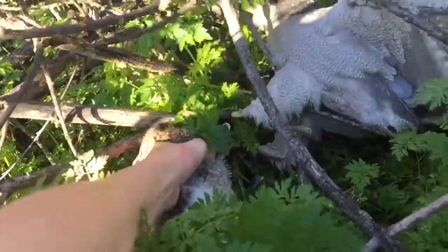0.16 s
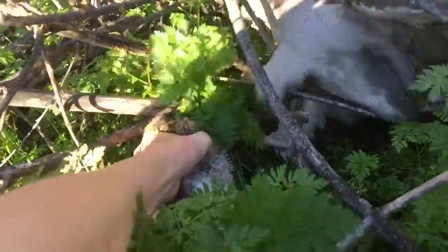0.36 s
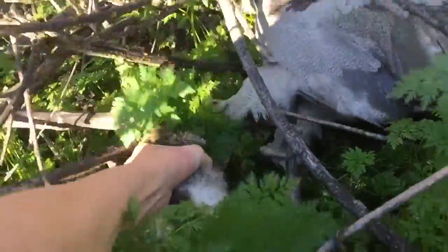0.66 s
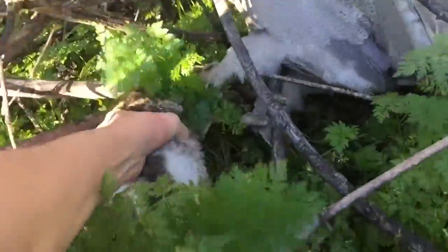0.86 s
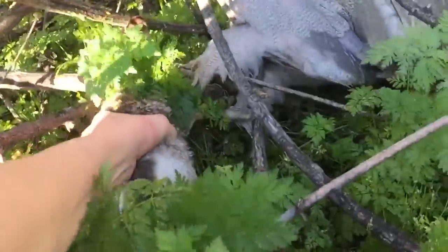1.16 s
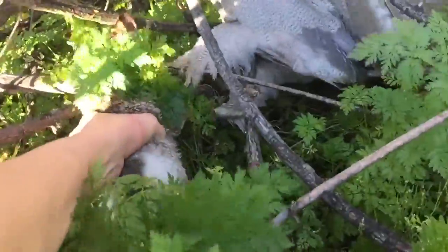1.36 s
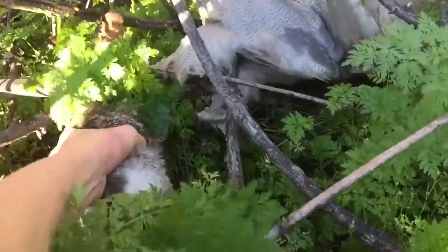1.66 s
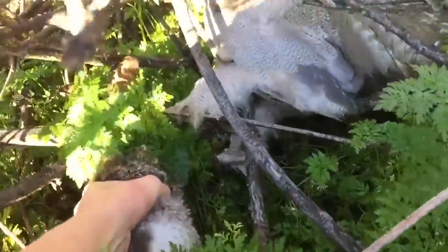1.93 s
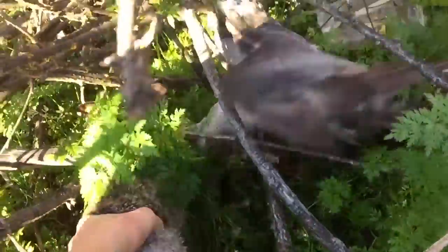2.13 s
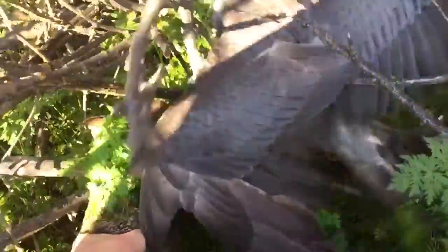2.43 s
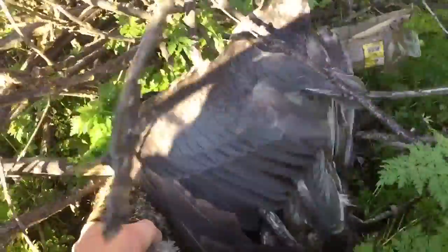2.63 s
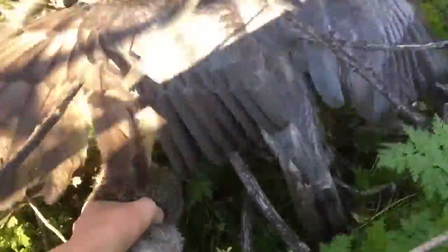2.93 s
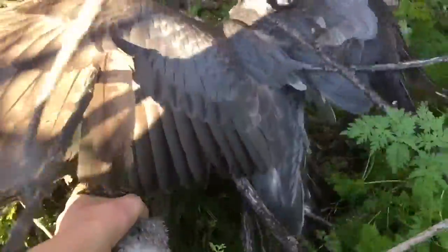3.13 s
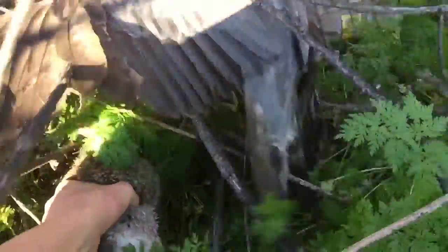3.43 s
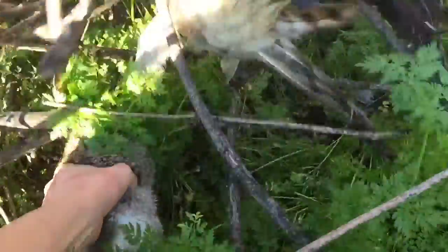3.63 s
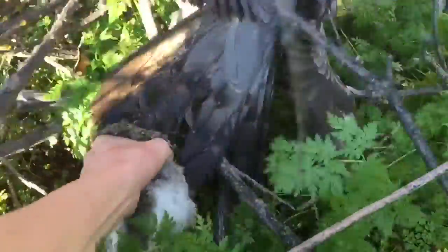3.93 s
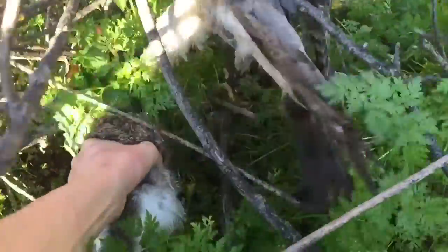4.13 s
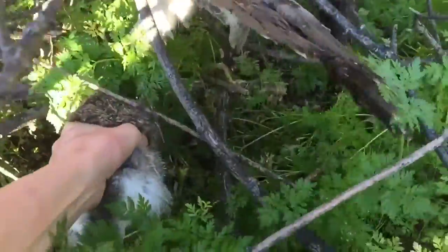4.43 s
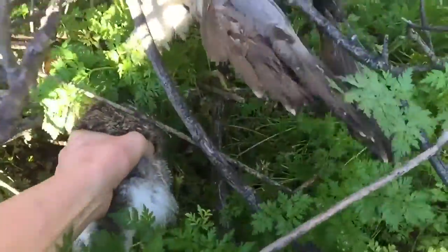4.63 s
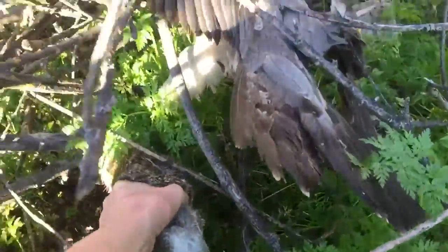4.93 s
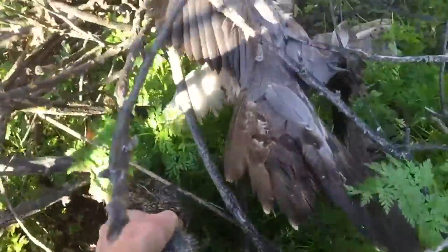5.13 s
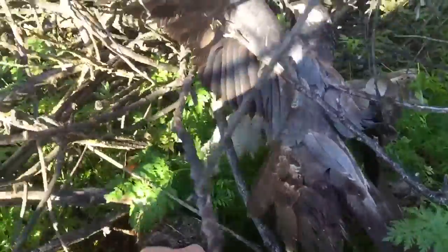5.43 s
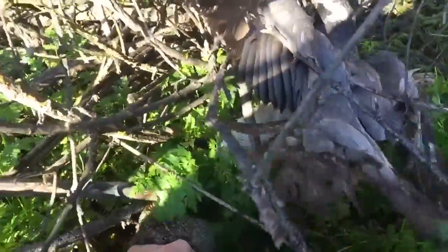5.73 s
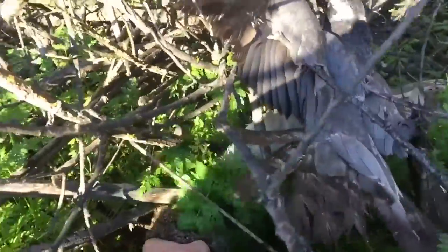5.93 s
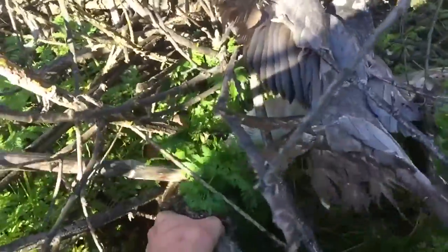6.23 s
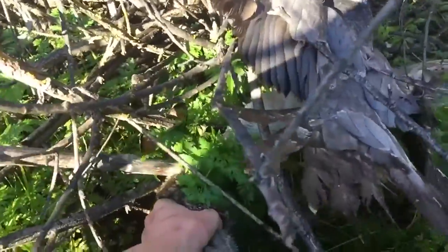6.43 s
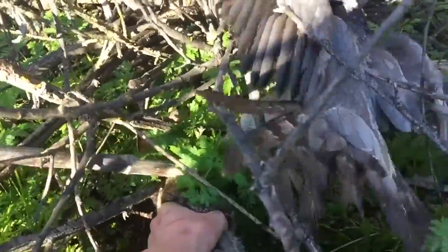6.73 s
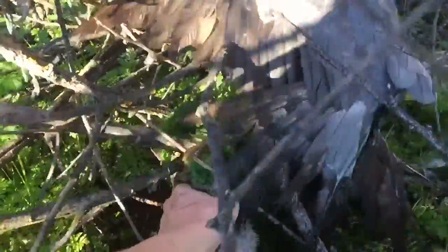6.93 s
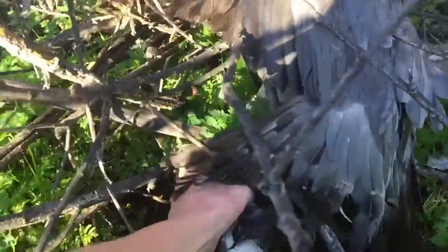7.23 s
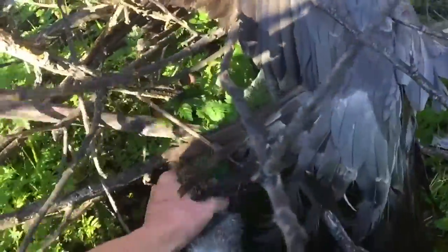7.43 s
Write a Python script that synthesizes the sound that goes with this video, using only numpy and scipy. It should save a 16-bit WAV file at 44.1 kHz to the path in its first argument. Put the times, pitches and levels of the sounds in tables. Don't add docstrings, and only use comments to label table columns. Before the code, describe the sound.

Outdoors in brush, close to a small handheld microphone, a rabbit screams about every two thirds of a second. Most cries start high, break into a rough rasp and fall to a fuller fluttering note. A hawk whines at the start, then squeaks briefly now and then. Twigs snap, feathers scrape leaves, dull bumps hit the camera, and lumpy wind stays low underneath.

```python
import sys
import numpy as np
from scipy import signal
from scipy.fft import rfft, irfft
from scipy.io import wavfile
from scipy.ndimage import uniform_filter1d

SR = 44100
rng = np.random.default_rng(int(sys.argv[2]) if len(sys.argv) > 2 else 0)


def pcm_store(signal):
    levels = np.round(np.clip(np.atleast_2d(signal), -1, 1) * 32767)
    wavfile.write(sys.argv[1], SR, levels.astype(np.int16).T)


def how_loud(loudness_db):
    steps = np.asarray(loudness_db, float) / 20
    return 10 ** steps


N = 333837


def evened(x):
    return x / np.sqrt(np.mean(x ** 2) + 1e-20)


def read(points, hz):
    f, value = np.transpose(points)
    return np.interp(np.log(hz + 1), np.log(f + 1), value)


def colour(x, points):
    gain = np.log(how_loud(read(points, abs(np.fft.fftfreq(4096, 1 / SR)))))
    taps = np.fft.ifft(np.exp(gain - 1j * signal.hilbert(gain).imag)).real[:2048]
    return signal.oaconvolve(x, taps)[:len(x)]


def filtered(x, order, hz, kind):
    return signal.sosfilt(signal.butter(order, hz, kind, fs=SR, output="sos"), x)


def wander(hz):
    z = rfft(rng.standard_normal(N))
    return evened(irfft(z / (1 + (np.fft.rfftfreq(N, 1 / SR) / hz) ** 4), N))


def add(mix, s, sound):
    part = mix[max(round(s * SR), 0):][:len(sound)]
    part += sound[:len(part)]


def joined(tables, size=260):
    tables = sorted(tables, key=lambda rows: rows[0][0] + rows[-1][0])
    t = np.arange(N) / SR
    s, *columns = np.transpose([row for rows in tables for row in rows])
    s = np.maximum.accumulate(s)
    pauses = [(a[-1][0], b[0][0]) for a, b in zip(tables, tables[1:]) if b[0][0] - a[-1][0] > .045]
    paused = np.any([(t > a) & (t < b) for a, b in pauses], axis=0)
    held = (t >= s[0]) * (t <= s[-1]) * ~paused
    closing = signal.oaconvolve(1. * held, np.ones(size) / size)[:N]
    gate = uniform_filter1d(np.maximum(held, closing), size=300)
    return *(np.interp(t, s, c) for c in columns), gate


# (frequency [Hz], density [dB per Hz])
AIR = [(18, -21), (30, 2.5), (86, -1.5), (334, -21), (513, -14), (770, -17.5), (932, -23.5), (1180, -22),
       (3460, -21), (9000, -57), (11700, -77), (19800, -73)]


def air():
    frames, hz = N // 256 + 5, np.fft.rfftfreq(1024, 1 / SR)
    a, b, patches = rng.standard_normal((frames, 513, 3)).T
    patches = uniform_filter1d(patches, size=8, axis=0)
    patches = evened(uniform_filter1d(patches, size=12, axis=1))
    gusts = np.append(wander(9.0)[::256], np.zeros(5))[:frames] / (1 + (hz[:, None] / 300) ** 2)
    z = (a + 1j * b) * how_loud(read(AIR, hz)[:, None] + 1.8 * patches + 3.2 * gusts)
    return how_loud(-46) * evened(signal.istft(z, nperseg=1024, noverlap=768)[1][:N])


def hiss():
    return how_loud(-85) * evened(filtered(rng.standard_normal(N), 2, [8500, 16000], "band"))


# (start [s], end [s], pitch from [Hz], pitch to [Hz], level [dB])
SHORT_WHINES = [(0.0, 0.113, 1602, 1904, -38), (0.11, 0.169, 1815, 1610, -28.5),
                (0.157, 0.191, 1600, 1650, -29), (2.592, 2.714, 810, 990, -54),
                (3.205, 3.311, 752, 1023, -47), (3.311, 3.354, 949, 861, -39),
                (4.972, 4.988, 1156, 1306, -35.5), (5.21, 5.255, 3315, 3290, -45),
                (5.189, 5.207, 4640, 4600, -45), (5.201, 5.223, 5220, 4980, -48),
                (7.134, 7.165, 913, 978, -31), (7.158, 7.195, 1360, 1490, -44)]
# (time [s], pitch [Hz], level [dB])
LONG_WHINES = [
    [(0.49, 726, -45), (0.53, 852, -50), (0.7, 791, -42), (0.73, 877, -37), (0.94, 842, -41),
     (1.01, 810, -32), (1.15, 500, -73)],
    [(4.986, 1532, -35), (4.995, 1765, -15), (5.025, 1828, -14.5), (5.04, 1700, -37), (5.104, 1794, -37),
     (5.16, 1763, -44), (5.28, 1548, -70)],
    [(1.424, 2446, -20.5), (1.436, 3145, -22), (1.447, 3515, -19), (1.456, 3380, -26), (1.464, 3150, -30)],
]


def hawk():
    out, tremble = np.zeros(N), wander(75)
    for rows in LONG_WHINES + [[(a, f, db), (b, g, db)] for a, b, f, g, db in SHORT_WHINES]:
        s, hz, db = np.transpose(rows)
        t = np.arange(s[0], s[-1], 1 / SR)
        pitch = np.interp(t, s, hz) * (1 + 0.014 * tremble[round(s[0] * SR):][:len(t)])
        turn = 2 * np.pi * np.cumsum(pitch) / SR
        shrill = (np.mean(hz) / 1700) ** 2 * (np.mean(hz) < 2200)
        tone = np.sin(turn) + shrill * (how_loud(-17) * np.sin(2 * turn) + how_loud(-28) * np.sin(3 * turn))
        level = np.sqrt(2) * how_loud(np.interp(t, s, db) + 1.4 * tremble[-len(t):])
        add(out, s[0], level * tone * signal.windows.tukey(len(t), 0.0049 / (s[-1] - s[0])))
    return out


# (loudest [s], rise [s], fall [s], fizz [dB], body above its usual share [dB])
RUSTLES = [(0.04, 0.064, 0.13, -93, 6), (0.5, 0.28, 0.6, -72.5, -6), (2.18, 0.16, 0.62, -89.5, 19.5),
           (2.5, .25, 0.11, -68, -1.5), (2.56, 0.013, 0.21, -76, -8.5), (2.781, .1, 0.062, -71.5, 2),
           (2.873, .05, 0.12, -48, -11.5), (3.068, 0.24, 0.21, -75.5, -2.5), (3.499, .3, 0.021, -58, -8.5),
           (3.585, 0.033, 0.18, -65.5, -9), (3.817, 0.0074, 0.022, -69.5, -5),
           (3.89, .06, 0.028, -46.5, -12.5), (3.942, 0.058, 0.092, -67, -5.5), (5.16, 0.035, 0.24, -92, 10),
           (6.93, 0.016, 0.026, -44.5, -11.5), (6.99, 0.0046, 0.25, -68, -10)]
# (frequency [Hz], density [dB per Hz])
LEAVES = [(88, -57), (150, -7.5), (487, -16), (569, -10.5), (1440, -12.5), (1880, -4.5), (2200, -15.5),
          (3360, -3), (4950, -18.5), (5670, -21), (15200, -56.5)]


def drags():
    edge_db = -12
    spared_db = -0.2 * edge_db
    return [[(s - rise, db + edge_db, body + spared_db),
             (s, db, body),
             (s + fall, db + edge_db, body + spared_db)]
            for s, rise, fall, db, body in RUSTLES]


def rustle():
    fizz_db, body_db, gate = joined(drags())
    sizes = how_loud(2.5 * np.minimum(rng.exponential(1, N), 4))
    grains = sizes * (rng.random(N) < 1500 / SR) * rng.choice([-1, 1], N)
    scrape = 1.18 * rng.standard_normal(N)
    leaves = colour((evened(grains) + scrape) * how_loud(3 * wander(120)), LEAVES)
    fizz = evened(filtered(leaves, 4, 9000, "high"))
    body = evened(filtered(leaves, 4, 9000, "low"))
    return gate * how_loud(fizz_db) * (how_loud(4.0) * fizz + how_loud(body_db + 37.5) * body)


# (time [s], peak level [dB])
CRACKS = [(0.014, -19.5), (0.5753, -25.5), (0.6211, -14.5), (1.953, -35), (3.846, -31), (3.8724, -12.5),
          (3.8941, -22), (7.103, -25.5), (7.108, -26), (0.518, -27), (0.606, -28), (3.322, -22.5),
          (2.158, -12.5), (2.752, -16), (2.917, -11), (7.133, -25), (7.168, -29), (7.178, -34),
          (7.191, -41), (7.218, -40)]


def cracks():
    out, t = np.zeros(N), np.arange(700) / SR
    ring_hz = LEAVES[np.argmax(np.transpose(LEAVES)[1])][0]
    ring = 0.98 * np.sin(2 * np.pi * ring_hz * t)
    splinters = rng.standard_normal((len(CRACKS), 700))
    for (s, db), noise in zip(CRACKS, splinters):
        add(out, s, how_loud(db - 60 * t / 0.024) * (ring + 0.43 * evened(colour(noise, LEAVES))))
    return out


# (start [s], end [s], effort at the end [dB], pitch after the attack [Hz], pitch at the end [Hz])
HIGH = [(0.069, 0.194, -21, 1071, 1147), (0.637, 0.79, -21, 1125, 1121), (1.284, 1.499, -20, 998, 1099),
        (2.024, 2.227, -20, 943, 1105), (2.707, 2.808, -19, 1030, 1120), (3.33, 3.48, -21, 980.3, 1073),
        (3.971, 4.12, -21, 1139, 1181), (4.601, 4.718, -20, 982, 1011), (5.27, 5.294, -21, 1211, 1233),
        (5.93, 6.056, -19, 1032, 1142), (6.593, 6.777, -19.5, 994, 1138), (7.234, 7.385, -19, 1083, 1048)]
# (start [dB per octave], end [dB per octave])
HIGH_MOUTH = [(1.5, -9.5), (2, 4), (0.5, 4), (2, 3.5), (-4.5, -3.5), (2.5, -3), (-2.5, -2.5), (-3.5, 0.5),
              (-6, 12.5), (-2, -7), (5.5, 3.5), (-3, -3.5)]
# (start [dB], end [dB])
HIGH_RING = [(1.5, -8.5), (5.5, 5), (0.5, 5.5), (3, -4), (1.5, 10), (3.5, -8), (-4, 3), (2.5, 5), (-3, 2),
             (1.5, -3), (6, -8), (-1, -12)]
# (fundamental [dB], partials over 4 kHz [dB], shake of the folds [dB])
HIGH_TONE = [(1.5, 0.5, 0.26), (5.3, 1.3, 1.2), (1.5, 2, 1.13), (-1.7, -.6, 0.36), (1, 8, 0.43),
             (3.5, 3.2, 0.43), (0, 1, 0.96), (3.8, 5.5, -0.6), (2.5, -.6, 0.8), (-0.7, -.6, 1),
             (2.1, -5.3, 0.5), (-0.5, -2, 1.5)]
# (start [s], end [s], effort [dB], pitch from [Hz], pitch to [Hz])
HOARSE = [(0.2, 0.28, -23, 1186, 1203), (0.28, 0.37, -23, 1221, 1155), (0.79, 0.855, -23, 1071, 1070),
          (2.815, 2.865, -19.5, 1144, 1124), (3.48, 3.575, -21, 1131, 1190),
          (5.43, 5.52, -20.5, 1154, 1110)]
# (start [s], end [s], effort [dB], pitch from [Hz], pitch to [Hz])
RESUMED = [(0.37, 0.465, -22, 1128, 1189), (4.72, 4.78, -20, 968, 1203), (5.303, 5.338, -24.5, 959.4, 1000),
           (5.342, 5.4, -22, 844, 911), (5.405, 5.43, -20, 1058, 987)]
# (start [s], end [s], effort [dB], upper line from [Hz], upper line to [Hz])
RASP = [(0.862, 1.115, -20.5, 1165, 1216), (1.5, 1.588, -19, 1227, 1501), (2.223, 2.313, -18, 1232, 1485),
        (2.87, 2.945, -21.5, 1298, 1579), (3.58, 3.603, -18.5, 1283, 1397), (4.121, 4.242, -19, 1250, 1415),
        (4.777, 4.858, -19, 1153, 1319), (5.515, 5.551, -18.5, 1153, 1293),
        (6.061, 6.197, -19.5, 1210, 1557), (6.778, 6.891, -20, 1236, 1488), (7.384, 7.519, -19, 1086, 1324)]
RASP_MOUTH = [.1, .1, .1, .1, .1, .1, .1, .1, .1, .1, .1]
# (two lowest partials [dB], upper partials [dB], shake of the folds [dB])
RASP_TONE = [(3, -2.4, -3), (.6, 2.2, 0.7), (.6, 1.7, 0.76), (.6, 4, -0.3), (.6, -1, 0.36), (.6, -1.8, .6),
             (5, 0.5, -0.5462), (.6, 0, .6), (3, -1.9, .6), (3, -4.3, .6), (5, -3.5, -0.55)]
# (top [s], end [s], effort [dB], top pitch [Hz], end pitch [Hz])
LOW = [(1.768, 1.853, -15, 771, 737.7), (2.395, 2.54, -14.5, 789.6, 752),
       (2.991, 3.164, -16.5, 800.3, 742.5), (3.645, 3.789, -15, 774, 746.6), (4.352, 4.429, -16, 781, 759),
       (4.932, 5.089, -15.5, 741, 670.5), (5.65, 5.762, -13, 754, 728), (6.385, 6.423, -13.5, 731.8, 752.4),
       (6.962, 7.064, -16, 858, 783.5), (7.555, 7.566, -16, 699, 727)]
LOW_ROUGH = [.11, .15, .17, .17, .15, .16, .22, .16, .29, .22]
# (start [dB per octave], top [dB per octave], end [dB per octave])
LOW_MOUTH = [(-0.5, 0.5, 2.5), (5.5, -2, -1.5), (-5, -1, -3.5), (7, 0, 3), (0.5, -1, 0), (-4.5, 1, -6),
             (-6, 1.5, 0.5), (-1, -2, 0.5), (-10, 2.5, 3.5), (3, -10.5, -2)]
# (start [dB], end [dB])
LOW_RING = [(5, -2.5), (1.5, -3.5), (9, -6), (0.5, 0), (4, 0), (2, -2), (5.5, -1), (-0.5, -6.5), (-7.5, -2),
            (4.5, 1)]
# (two lowest partials [dB], upper partials [dB], shake of the folds [dB])
LOW_TONE = [(.6, .6, -1.1), (.6, -0.0089, -0.7), (.6, 1, 0.22), (.6, 0.26, 0.5), (.6, 0.93, -0.8),
            (.6, 0.092, -1.5), (.6, 0.23, 2), (.6, 0.36, -2.5), (.6, -2.5, -1.7), (.6, 0.21, -1)]


def high_note(note, mouth, ring, tone):
    start, end, db, f, g = note
    attack_s, swell_s, rough = .03, 0.099, 0.18
    swell_hz = np.interp(start + attack_s, [start + attack_s, end], [f, g])
    opening = (rough, 1, mouth[0], ring[0], *tone)
    return [(start + .004, db - 14.5, .82 * f, *opening),
            (start + attack_s, db - 4.5, f, *opening),
            (min(start + swell_s, end), db, swell_hz, *opening),
            (end, db, g, rough, 1, mouth[1], ring[1], *tone)]


def rasp_note(note, mouth, tone):
    start, end, db, f, g = note
    manner = (0.56, 0, mouth, 0, *tone)
    return [(start, db - 0.5, f / 2, *manner), (end, db + 0.5, g / 2, *manner)]


def low_note(rasp, note, rough, mouth, ring, tone):
    top, end, db, f, g = note
    return [(rasp[1], rasp[2] + 2, rasp[-1] / 2, rough, 0, mouth[0], ring[0], *tone),
            (top, db, f, rough, 0, mouth[1], np.mean(ring), *tone),
            (end, db, g, rough, 0, mouth[2], ring[1], *tone)]


def screams():
    parts = [high_note(*row) for row in zip(HIGH, HIGH_MOUTH, HIGH_RING, HIGH_TONE)]
    for table, rough, shake_db in (RESUMED, 0.18, -4), (HOARSE, 0.54, -1.5):
        manner = (rough, 1, 0, 0, 0, 0, shake_db)
        parts += [[(a, db, f, *manner), (b, db, g, *manner)] for a, b, db, f, g in table]
    parts += [rasp_note(*row) for row in zip(RASP, RASP_MOUTH, RASP_TONE)]
    lows = zip(RASP[1:], LOW, LOW_ROUGH, LOW_MOUTH, LOW_RING, LOW_TONE)
    return parts + [low_note(*row) for row in lows]


# (time [s], pitch drop [share])
SLIPS = [(0.129, 0.121), (0.182, 0.0941), (0.412, 0.0657), (0.666, 0.073), (0.676, 0.0642), (0.727, 0.0775),
         (1.312, 0.0683), (1.32, 0.0897), (1.373, 0.0538), (1.408, 0.099), (1.713, 0.0656), (1.74, 0.0702),
         (1.764, 0.0702), (2.068, 0.0915), (2.134, 0.0888), (2.206, 0.0647), (2.477, 0.0657),
         (2.512, 0.071), (2.733, 0.086), (2.804, 0.074), (3.02, 0.0963), (3.048, 0.0678), (3.401, 0.0764),
         (3.473, 0.0554), (3.629, 0.047), (3.659, 0.0781), (3.682, 0.0564), (3.75, 0.066), (4.024, 0.091),
         (4.082, 0.1027), (4.103, 0.085), (4.312, 0.056), (4.332, 0.0634), (4.361, 0.0665), (4.388, 0.0769),
         (4.648, 0.1544), (4.67, 0.0706), (4.915, 0.0828), (5.035, 0.053), (5.065, 0.061), (5.631, 0.059),
         (5.669, 0.1043), (5.692, 0.0904), (5.992, 0.1148), (6.024, 0.0898), (6.623, 0.0883), (6.66, 0.102),
         (6.769, 0.0542), (6.903, 0.0485), (6.936, 0.0577), (6.96, 0.06), (6.986, 0.0478), (7.028, 0.0737),
         (7.036, 0.0708), (7.051, 0.063), (7.064, 0.0623), (7.291, 0.122), (7.327, 0.101), (7.349, 0.068),
         (7.376, 0.049),
         (1.36, 0.0498), (1.391, 0.0599), (1.79, 0.0596), (1.827, .04), (1.842, 0.0412), (2.376, .04),
              (2.541, 0.0494), (2.985, 0.0497), (3.07, .04), (3.145, .05), (4.261, .05), (4.284, .07),
              (4.409, 0.044), (4.988, .05), (6.349, .04), (6.391, .04), (7.263, .07)]


def lurches():
    out, t = np.zeros(N), np.arange(-SR // 200, SR // 30) / SR
    shape = np.where(t < 0, np.exp(-(t / .0016) ** 2), np.exp(-(abs(t) / .006) ** 1.4))
    for s, drop in SLIPS:
        add(out, s + t[0], 1.15 * drop * shape)
    return out


def slips(shake):
    flutter_hz, flutter_depth, slip_chance, slip_drop = 80.86, 0.057, .03, 0.028
    beat = np.cumsum(flutter_hz * (1 + .1 * wander(15))) / SR
    flutter = uniform_filter1d(np.exp(-(beat % 1) / 0.32), size=130) - .3
    depth = shake * flutter_depth * np.clip(1.1 + .5 * wander(34), 0, 4)
    limp = np.clip(0.3 * (1 + wander(2.5)), 0, 1) * np.cos(np.pi * beat)
    t = np.arange(-SR // 200, SR // 50) / SR
    shape = np.where(t < 0, np.exp(-(t / .0022) ** 2), np.exp(-(t / .004) ** 2))
    chance = (np.diff(beat // 1, prepend=0) > 0) * (rng.random(N) < slip_chance) * slip_drop
    return depth * flutter * (1 + limp) + signal.oaconvolve(chance, shape)[SR // 200:][:N]


# (frequency [Hz], gain [dB])
THROAT = [(400, -44.5), (800, -29), (1100, -10), (1500, -13), (2100, -7.5), (3000, -1), (3800, -5),
          (4400, -17), (4900, -21), (5400, -16.5), (6200, -30.5), (8000, -39), (9500, -38), (10600, -53),
          (15000, -61)]
# (frequency [Hz], gain [dB])
BREATH = [(1000, -0.5), (2000, 3.5), (2900, -2), (3900, -11.5), (6000, 8.5), (11000, -0.5), (15000, -35)]
HIGH_FOLDS_DB = [9.9, 8.2, 1.5, 1.15, 6.1]
LOW_FOLDS_DB = [8.5, -5, 4, 9, 6]


def rabbit():
    effort_db, hz, rough, high, mouth_db, ring_db, root_db, upper_db, shake_db, gate = joined(
        screams(), size=800)
    mouth_db = mouth_db - 7 * (1 - gate)
    effort_db, mouth_db, ring_db = uniform_filter1d([effort_db, mouth_db, ring_db], size=400)
    rough = np.clip(uniform_filter1d(rough + .25 * (1 - gate), size=500), 0, 1)
    low = 1 - high

    lurch = lurches()
    shaken_db = 0.304 * (effort_db + 18) + 43 * (2.0 - high) * np.clip(rough - .2, 0, .3) * (rough < .4)
    slip = lurch + slips(how_loud(shake_db)) * how_loud(shaken_db)
    bright_db = high * (2.0 * (np.maximum(effort_db, -27) + 26.0) + 40 * np.log2(hz / 1130))
    jitter = 0.017 * high * wander(70.5) + 0.00789 * wander(110.0)
    jitter += 0.01206 * high * wander(276) + 0.1445 * rough ** 2 * wander(515)
    sag = .13 * (1 - gate) ** 3
    turns = np.cumsum(1.012 * hz * (1 - slip - sag + how_loud(shake_db) * jitter)) / SR

    folds, patches, smear = np.zeros(N), wander(148), wander(200)
    drift = wander(1.24)
    for k in range(1, 19):
        j = min(k, len(LOW_FOLDS_DB)) - 1
        shift = k * N // 20
        line_hz = k * hz
        db = high * HIGH_FOLDS_DB[j] + low * LOW_FOLDS_DB[j]
        db += bright_db * np.clip(np.log2(line_hz / 2500), -.4, .6)
        db += ring_db * (k == 3 - high)
        db += mouth_db * np.clip(np.log2(line_hz / 2800), -.5, .5)
        nasal_octaves = np.log2(line_hz * (1 - slip - sag) / 2000)
        db += 6 * np.maximum(high, 1 - gate) * np.exp(-.5 * (nasal_octaves / 0.04) ** 2)
        patchy_db = 1.12 + 0.11 * k + 0.73 * high * (k > 2) + 0.56 * rough
        db += patchy_db * np.roll(patches, shift) + (0.69 + 0.53 * k) * np.roll(drift, shift)
        db -= high * 7 * np.clip(np.log2(line_hz / 8500), 0, 2)
        db -= 6 * (k == 1) * low * np.clip((rough - .3) / .2, 0, 1)
        db += root_db * (k <= 2 - high) + upper_db * (k > 5 - 2 * high)
        db -= 2 * (k == 6) * low
        db -= 50 * high * lurch * (k > 3) + 60 * high * slip * (k == 1)
        phase = .6 * k + .15 * k ** 2 + (line_hz / 7400) ** 3 * np.roll(smear, shift)
        folds += how_loud(db) * np.cos(2 * np.pi * k * turns + phase) * (line_hz < 16000)
    folds *= 1 + 1.4 * rough ** 2 * high * (1 + 0.27 * wander(44)) * np.cos(np.pi * turns)

    puffs = (.4 + np.exp(-(turns % 1) / .3)) * rng.standard_normal(N) * how_loud(2.5 * wander(120))
    shriek_hz = 2730 + 296.6 * wander(25)
    shriek = np.cos(2 * np.pi * np.cumsum(shriek_hz) / SR) * wander(200)
    puffs = evened(colour(puffs, BREATH)) + how_loud(-3.7 - 7) * np.clip(2 * rough, 0, 1) * shriek
    share = np.clip(.025 + 1.25 * rough ** 2, 0, 1)
    voice = colour(np.sqrt(1 - share ** 2) * evened(folds) + share * evened(puffs), THROAT)
    voice *= how_loud(-12 * slip * high)
    voice /= np.sqrt(abs(uniform_filter1d(voice ** 2, size=1800)) + 1e-12)
    burst_db = 36 * (0.5 - high) * (lurch - uniform_filter1d(lurch, size=1800))
    return how_loud(effort_db + burst_db) * abs(gate) ** 0.32 * voice


# (time [s], peak level [dB], pitch [Hz])
BUMPS = [(0.239, -24.5, 110), (0.427, -22.5, 102), (0.632, -26.5, 100), (0.958, -24.5, 91),
         (1.789, -12.5, 104), (2.301, -22, 96.5), (2.905, -21, 219), (2.916, -21, 86), (3.388, -22, 106.9),
         (3.6, -25.5, 232.3), (3.854, -23.5, 126.6), (4.729, -29, 121.4), (5.916, -27, 103.6),
         (6.922, -44, 154.2), (7.403, -23.5, 73.96)]


def bumps():
    out, t = np.zeros(N), np.arange(4000) / SR
    for s, db, hz in BUMPS:
        add(out, s, how_loud(db - 60 * t / 0.059) * np.sin(2 * np.pi * hz * t) * (1 - np.exp(-t / 0.001)))
    return out


# (time [s], peak level [dB])
TICKS = [(0.4996, -49.5), (0.569, -60), (0.6189, -62), (1.9519, -63.5), (2.0377, -44), (2.1574, -50),
         (2.2214, -43.5), (2.4417, -41), (2.4572, -38.5), (2.7505, -44), (2.8044, -49), (2.8643, -36.5),
         (2.8794, -41.5), (2.8944, -42.5), (2.9164, -38), (3.291, -59.5), (3.3199, -47), (3.4594, -56.5),
         (3.6076, -37), (3.8436, -45), (3.8655, -41), (3.88, -36), (3.8944, -39), (5.0074, -52.5),
         (5.0149, -41.5), (6.924, -36.5), (6.9394, -34.5), (7.1017, -57), (7.1311, -45)]


def ticks():
    out, t = np.zeros(N), np.arange(200) / SR
    noise = rng.standard_normal((len(TICKS), 200)) * how_loud(-60 * t / .004)
    for (s, db), burst in zip(TICKS, filtered(noise, 2, 7000, "high")):
        add(out, s, how_loud(db + 14) * burst / abs(burst).max())
    return out


# (time [s], peak level [dB], ring [Hz], sharp tick [dB])
SNAPS = [(0.519, -29.5, 825, -76), (0.577, -26.5, 1170, -47), (0.603, -30, 835, -77),
         (1.238, -52, 987, -70), (1.953, -22.5, 1602, -50), (1.966, -32, 1061, -66),
         (2.038, -17.5, 1010, -36), (2.107, -31, 940, -62), (2.157, -15, 1580, -60),
         (2.222, -19.5, 1530, -47), (2.459, -11, 1494, -29.5), (2.752, -23, 1500, -35),
         (2.805, -18, 900, -31.5), (2.864, -50, 1135, -46.5), (2.916, -12, 1390, -27.5),
         (2.935, -14.5, 1040, -36), (3.065, -26.5, 890, -52), (3.609, -18.5, 1638, -35),
         (3.819, -28.5, 312, -44), (4.102, -38, 1144, -38.5), (5.915, -25, 285, -52),
         (7.105, -38, 1430, -67)]


def snaps():
    out, t = np.zeros(N), np.arange(900) / SR
    noise = rng.standard_normal((len(SNAPS), 900))
    for (s, db, hz, tick_db), crack in zip(SNAPS, noise):
        wood = np.sin(2 * np.pi * hz * t) * how_loud(db - 60 * t / 0.018)
        bright = colour(crack * how_loud(-60 * t / 0.067), LEAVES)
        add(out, s, wood + how_loud(tick_db + 19) * bright / abs(bright).max())
    return out


def brush(x):
    t = np.arange(12000) / SR
    decay = how_loud(-60 * t / 0.011) + how_loud(-28.0 - 60 * t / 0.15)
    tail = rng.standard_normal(12000) * decay * (t > .002)
    return x + how_loud(-11) * signal.oaconvolve(x, tail / np.linalg.norm(tail))[:N]


def scene():
    in_brush = rabbit() + hawk() + rustle() + snaps() + cracks() + ticks()
    return (brush(in_brush) + bumps() + air() + hiss())[None]


def low_pass(x):
    return signal.sosfilt(signal.butter(12, 15330, fs=SR, output="sos"), x)


def record(dry):
    cut = filtered(dry, 2, 52, "high")
    return low_pass(cut)


dry = scene()
out = record(dry)
pcm_store(out)
```